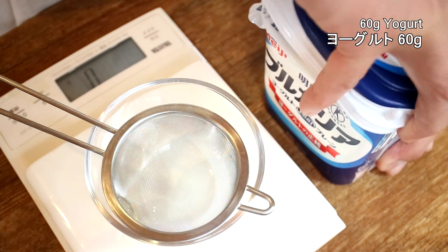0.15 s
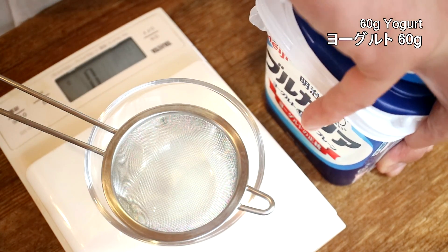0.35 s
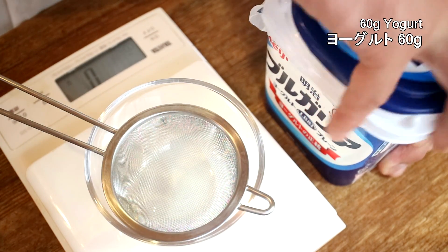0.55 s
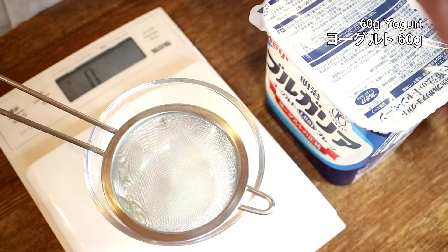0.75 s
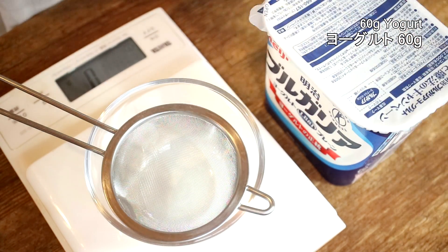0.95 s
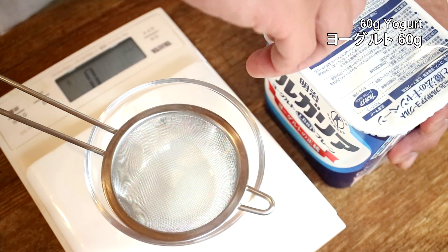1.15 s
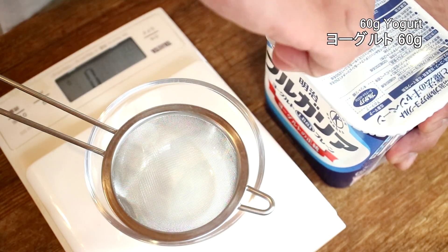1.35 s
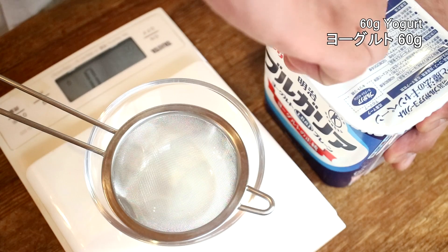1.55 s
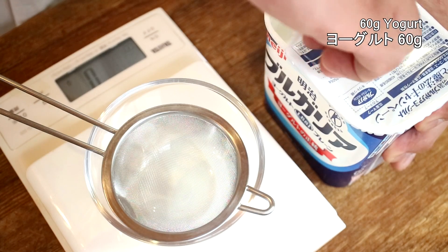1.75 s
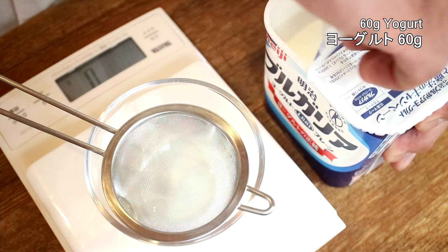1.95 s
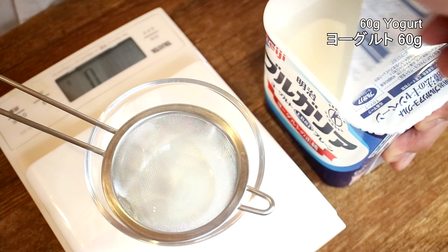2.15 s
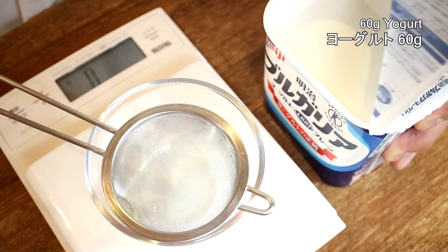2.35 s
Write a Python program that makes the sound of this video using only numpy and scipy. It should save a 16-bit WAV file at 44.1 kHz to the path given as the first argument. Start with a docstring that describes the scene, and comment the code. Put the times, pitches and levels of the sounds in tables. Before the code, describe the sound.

A plastic lid pops off a tub, then its paper seal crackles and peels back.

```python
"""A plastic lid creaks and pops off its tub, fingers tap the tub, then the paper seal is pinched and peeled.
The tub stands on a table in a small kitchen, close to a stereo microphone.
Blows and stick-slip rubbing ring the same tub modes; the paper crackles and squeaks on top.
The kitchen answers over a faint hum. The two microphone ports hear the tub's midrange unequally."""
import sys
import numpy as np
from scipy import signal
from scipy.fft import rfft, irfft
from scipy.io import wavfile

SR = 44100
rng = np.random.default_rng(int(sys.argv[2]) if len(sys.argv) > 2 else 0)


def int16_out(signal):
    """Quantize to a 16-bit WAV file."""
    q = np.round(np.clip(np.atleast_2d(signal).T, -1, 1) * 32767)
    wavfile.write(sys.argv[1], SR, q.astype(np.int16))


N = 110250
T = np.arange(N) / SR
F = np.maximum(np.arange(N // 2 + 1) * SR / N, 1)

# Rubbing trim for each mode group, low to high: gain_db
RUB_TRIM = (-4.5, -2, -6, -6.5, -5.5, -6.5)


def tub(slips_per_s=1200, shakes_per_s=3000, blow_db=-0.5, low_cut_hz=115):
    """The tub, close up: blows and stick-slip rubbing ring each of six groups of modes."""
    impulse, out = 1. * (T == 0), 0
    for group, rub_column in enumerate((1, 2, 3, 3, 4, 4)):
        slips, shakes = grains(slips_per_s, spread_db=2.5), grains(shakes_per_s, spread_db=0.7)
        blow_peak = np.abs(ring(impulse, group)).max()
        slip_rms = np.sqrt(np.mean(ring(slips, group) ** 2))
        struck = blows(group + 1, shakes) * undb(blow_db) / blow_peak
        rubbed = slips * rubbing(rub_column) * undb(RUB_TRIM[group]) / slip_rms
        out = out + ring(struck + rubbed, group)
    return signal.lfilter(*signal.butter(2, low_cut_hz, "high", fs=SR), out)


# Modes of the tub, lid and table, levels relative within a group: pitch_hz, level_db, t60_s
TUB_MODES = [(160.8, 0.5, 0.11), (221, -5.5, 0.037), (277.4, -1.5, 0.088), (427, -4.5, 0.023),
             (451, 4.5, 0.079), (513.5, 2, .07), (677, -7, .07), (833.7, 4, 0.06), (912, -0.5, 0.037),
             (944, -8, 0.037), (1007, 2, 0.042), (1133, -11.5, .05), (1220, -16, .04), (1666, 0, 0.02),
             (1617, -1.5, 0.047), (1817, 6, 0.023), (1994, -3, 0.017), (2366, 1.5, 0.02), (2748, 3.5, .025),
             (3193, -4.5, .025), (3443, -8.5, 0.048), (3770, -7.5, .025)]
# Borders of the mode groups: edge_hz
GROUP_EDGES = (110, 350, 600, 915, 1400, 2200, 4500)


def ring(force, group):
    """A force sets one group of modes ringing, each a decaying sine."""
    low, high = GROUP_EDGES[group:group + 2]
    band = signal.butter(1, (low * 0.71, high * 1.59), "band", fs=SR, output="sos")
    force, out = signal.sosfilt(band, force), 0
    for hz, db, t60 in TUB_MODES:
        if low <= hz < high:
            pole = np.exp((2j * np.pi * hz - np.log(1000) / t60) / SR)
            out = out + undb(db) * signal.lfilter([1], [1, -pole], force).imag
    return out


# Blows of lid and fingers, relative strength in each mode group and in the crack:
# start_s, bottom_db, walls_db, lid_low_db, lid_high_db, rim_low_db, rim_high_db, crack_db
BLOWS = [(0.139, -66, -58, -57, -51, -55, -59, -78), (0.19, -40, -31.5, -38, -28.5, -29.5, -32, -68),
         (0.213, -32.5, -15.5, -4, -12, -12, -24.5, -27),
         (0.227, -44.5, -26.5, -23.5, -37.5, -28, -38.5, -59.5),
         (0.239, -71.5, -44, -34.5, -52, -55, -44, -39.5), (0.255, -46, -40.5, -41.5, -56, -41.5, -55, -52),
         (0.272, -54, -30.5, -33.5, -51, -34.5, -55, -59), (0.349, -64, -46, -49.5, -52.5, -45.5, -51, -57),
         (0.524, -58.5, -62, -69, -50, -56.5, -65.5, -75), (0.575, -71, -61, -65, -40.5, -62, -72, -80),
         (0.592, -57, -39, -35, -29.5, -35, -33.5, -75), (0.607, -54.5, -61, -52.5, -49.5, -52.5, -49, -68),
         (1.1, -58.5, -38.5, -35.5, -33, -52, -47.5, -64.5), (1.108, -45.5, -36, -42, -41, -47, -64, -75),
         (1.171, -68, -53, -67, -45.5, -70, -59, -71), (1.215, -60, -62, -48, -55, -73, -71, -75),
         (1.328, -46.5, -34, -30.5, -44, -45.5, -47.5, -62.5),
         (1.503, -62, -60.5, -49.5, -45, -52.5, -62.5, -51),
         (1.572, -49.5, -49, -63, -52, -60.5, -42, -54.5), (1.583, -74, -61, -39.5, -66, -53, -41, -41),
         (1.6, -76, -73, -38, -39, -67, -47, -36), (1.636, -46, -43, -37, -36, -70, -44, -42),
         (1.733, -58, -52.5, -40.5, -36.5, -53, -50, -68), (1.825, -71, -48.5, -50.5, -28, -45, -39, -63),
         (1.863, -56, -36.5, -100, -30.5, -38, -36, -45), (1.883, -39, -64, -76, -29, -62, -46, -53),
         (1.949, -43, -59, -38, -44, -55, -45, -37), (2.002, -46.5, -62, -55, -44, -61, -42, -38),
         (2.223, -66, -52, -26, -31.5, -51, -31, -31.5), (2.235, -46, -63, -50.5, -31, -24.5, -26, -34.5),
         (2.39, -51, -56, -59, -53, -42.5, -54, -49)]


def blows(column, shakes=0, rattle_db=-33, rattle_delay_s=0.0053, rattle_decay_s=0.02):
    """One click a blow; any shakes follow it as a dying rattle."""
    clicks = np.zeros(N)
    for row in BLOWS:
        clicks[int(row[0] * SR)] = undb(row[column])
    fade = decay(np.roll(clicks, int(rattle_delay_s * SR)), rattle_decay_s)
    return clicks + undb(rattle_db) * shakes * fade


# Relative strength of the rubbing: time_s, bottom_db, walls_db, lid_db, rim_db, paper_db
RUBBING = [(0, -62, -77, -57, -81.5, -87), (0.06, -94, -56, -59, -61.5, -75.5),
           (0.12, -53, -68.5, -67.5, -79, -101), (0.182, -77, -60, -61.5, -61, -69),
           (0.42, -57.5, -69, -66, -72.5, -91.5), (0.5, -74.5, -76, -69, -85, -111.5),
           (0.54, -75, -74.5, -55.5, -67, -69.5), (0.565, -81.5, -75, -74, -76, -92),
           (0.613, -52, -53, -67, -58.5, -66.5), (0.7, -71, -80, -82, -86, -102.5),
           (0.79, -77.5, -84.5, -77.5, -80, -78.5), (0.85, -80.5, -71.5, -77, -89.5, -94.5),
           (0.94, -74.5, -81, -77, -79, -79), (1.0, -88.5, -81, -77.5, -80, -84),
           (1.07, -91.5, -67, -69, -65.5, -72.5), (1.15, -85, -68, -71, -80, -82),
           (1.24, -110.5, -77, -53, -66.5, -82), (1.3, -77.5, -66, -72, -74, -83),
           (1.348, -70, -56, -47, -66.5, -66), (1.45, -67.5, -74.5, -78, -83.5, -86),
           (1.5, -74, -67.5, -63, -68, -68.5), (1.55, -69, -62.5, -58.5, -62.5, -67.5),
           (1.61, -51, -62, -51, -57, -58), (1.681, -54.5, -71, -67, -73.5, -78),
           (1.75, -69, -62, -51.5, -61.5, -68), (1.8, -53, -62, -58, -60.5, -69),
           (1.839, -49, -48, -41.5, -50.5, -59), (1.9, -47.5, -54, -38, -48.5, -53.5),
           (1.95, -58, -52.5, -47.5, -53.5, -57.5), (1.98, -57, -61, -50, -54.5, -61.5),
           (2.04, -49, -59, -47, -55.5, -59.5), (2.08, -53.5, -58, -49.5, -53, -65.5),
           (2.12, -48, -53.5, -46.5, -52.5, -59), (2.171, -33.5, -44, -40.5, -56, -57.5),
           (2.2, -40, -49, -48, -53.5, -59), (2.26, -36, -47, -45, -52, -55.5),
           (2.29, -46.5, -56, -53, -50.5, -57.5), (2.33, -35, -61, -48.5, -55.5, -61.5),
           (2.37, -45.5, -52.5, -55, -55, -58), (2.452, -36, -61, -51, -53, -60.5),
           (2.5, -43, -55, -43, -54, -59)]


def rubbing(column):
    """How hard one part is rubbed, gliding from moment to moment."""
    rows = np.array(RUBBING)
    return undb(np.interp(T, rows[:, 0], rows[:, column]))


CRACKLE_PER_S, CRACKLE_SPREAD_DB = 1700, 2
# Spectrum of the paper seal: frequency_hz, density_db
PAPER_SPECTRUM = [(1760, -33), (3000, -5), (3490, -1.5), (4100, -5.5), (4770, -4.5), (7270, -8.5),
                  (12900, -22), (16800, -61), (22000, -120)]


def paper(hiss_share=0.7, crackle_db=1.5, crack_db=-9.5, crack_cutoff_hz=6145, tail_db=-16):
    """Paper and skin crackle wide across the microphone, with a short bright crack at each blow."""
    def crackle():
        clicks = grains(CRACKLE_PER_S, CRACKLE_SPREAD_DB)
        return unit(colour(clicks + hiss_share * rng.standard_normal(N), PAPER_SPECTRUM))

    mid, side = crackle(), crackle()
    peel = np.array([mid + side, mid - side]) * rubbing(-1) * undb(crackle_db)
    hiss = colour(rng.standard_normal(N), PAPER_SPECTRUM)
    hiss = unit(signal.lfilter(*signal.butter(1, crack_cutoff_hz, fs=SR), hiss))
    snaps = blows(-1)
    cracks = decay(snaps, decay_s=0.0022) + undb(tail_db) * decay(snaps, decay_s=0.025)
    return peel + hiss * cracks * undb(crack_db)


# Brief squeaks of the stretched seal: start_s, length_s, pitch_hz, level_db
SQUEAKS = [(0.78, 0.03, 2770, -76), (0.93, 0.03, 2940.0, -76), (1.55, 0.02, 6400, -65),
           (1.552, 0.014, 3340, -60), (1.597, 0.0067, 5130, -48), (1.608, 0.0098, 6160, -49.5),
           (1.811, 0.033, 4320.0, -53.5), (1.842, 0.051, 3700, -52.5), (1.873, 0.023, 6410.0, -56),
           (1.93, 0.032, 2680, -48.5), (2.009, 0.044, 2910, -52.5), (2.041, 0.025, 7000, -63.5),
           (2.102, 0.015, 3960.0, -52.5), (2.133, 0.054, 2770, -49), (2.202, 0.054, 2730.0, -51),
           (2.294, 0.1, 7340, -62), (2.388, 0.014, 3500, -48.5), (2.4, 0.04, 6800, -61)]


def squeaks(q=15.5, edge_s=0.0025):
    """Each short spell of slipping rings one narrow resonance of the taut paper."""
    slips, out = grains(CRACKLE_PER_S, CRACKLE_SPREAD_DB), 0
    for start, length, hz, db in SQUEAKS:
        gate = np.clip(np.minimum(T - start, start + length - T) / edge_s, 0, 1)
        squeak = signal.lfilter(*signal.iirpeak(hz, q, fs=SR), gate * slips)
        out = out + undb(db) * squeak * np.sqrt(SR * q / (np.pi * hz))  # makes up for the narrow band
    return out


def kitchen(sound, level_db=-12.5, t60_s=0.29, treble_db=-3, treble_t60_s=0.25):
    """The walls answer with a short tail, duller as it fades, different at each port."""
    damping_hz, low_cut_hz, onset_s = 3000, 450, 0.0061
    t = T[:SR // 2]
    dull, bright = rng.standard_normal((2, 2, len(t)))
    dull = signal.lfilter(*signal.butter(1, damping_hz, fs=SR), dull) * undb(-60 * t / t60_s)
    bright = bright * undb(treble_db - 60 * t / treble_t60_s)
    tail = (dull + bright) * np.clip(t / onset_s, 0, 1)
    tail = signal.lfilter(*signal.butter(1, low_cut_hz, "high", fs=SR), tail)
    tail = unit(tail) / np.sqrt(len(t))
    return signal.fftconvolve(sound[None], tail, axes=1)[:, :N] * undb(level_db)


# Spectrum of the quiet kitchen: frequency_hz, density_db
AIR_SPECTRUM = [(18, -25), (30, 4.5), (134, -10), (182, -12), (253, -14), (753, -21.5), (946, -22),
                (2420, -28), (2610, -27), (5590, -35), (12000, -43), (12900, -49.5), (16800, -79),
                (22000, -120)]
# Tones of an appliance in the background: pitch_hz, level_db
HUM = [(236.9, -71.5), (441.4, -79.5)]


def room_tone(air_db=-62.5, alike_below_hz=486):
    """Room noise, alike at both ports in the bass only, and a steady appliance hum."""
    mid, side = (rfft(rng.standard_normal(N)) * undb(along(AIR_SPECTRUM)) for _ in range(2))
    coherence = 1 / (1 + (F / alike_below_hz) ** 2)
    mid, side = irfft(mid * np.sqrt(1 + coherence), N), irfft(side * np.sqrt(1 - coherence), N)
    air = np.array([mid + side, mid - side]) / np.sqrt(np.mean(mid ** 2))
    hum = sum(np.sqrt(2) * undb(db) * np.sin(2 * np.pi * (hz * T + rng.random())) for hz, db in HUM)
    return air * undb(air_db) + hum


# Balance of the microphone's two ports: frequency_hz, left_minus_right_db
PORT_BALANCE = [(60, 1.5), (110, 0), (200, -0.5), (360, 2.5), (640, 7.5), (1160, 11), (2100, -1.5),
                (3810, -0.5), (6890, -0.5), (12500, -0.5)]
# Phase between the ports: frequency_hz, left_lead_rad
PORT_PHASE = [(100, 0), (860, .4), (1040, .9), (1160, 2.2), (1550, .2), (3200, -.7), (4000, .5), (13000, 0)]


def ports(sound):
    """The right port hears the midrange weaker than the left and turned in phase."""
    right = undb(-along(PORT_BALANCE)) * np.exp(-1j * along(PORT_PHASE))
    makeup = 2 / np.maximum(np.abs(1 + right), 1)  # holds up the level of the two ports' sum
    return irfft(rfft(sound) * np.array([np.ones_like(right), right]) * makeup, N)


def grains(per_s, spread_db, loudest_one_in=60):
    """Random clicks of uneven, capped size, at unit rms."""
    chance, sign, rarity = rng.random(size=(3, N))
    size = undb(-spread_db * np.log(np.maximum(rarity, 1 / loudest_one_in)))
    return unit((chance < per_s / SR) * np.sign(sign - .5) * size)


def decay(clicks, decay_s):
    """Gives each click an exponential tail."""
    return signal.lfilter([1], [1, -np.exp(-1 / (decay_s * SR))], clicks)


def along(table):
    """Rows of (frequency_hz, value) read at every frequency."""
    hz, value = np.array(table, float).T
    return np.interp(np.log(F), np.log(hz), value)


def colour(x, spectrum):
    return irfft(rfft(x) * undb(along(spectrum)), N)


def undb(db):
    return 10 ** (np.asarray(db) / 20)


def unit(x):
    return x / np.sqrt(np.mean(x ** 2))


def scene():
    """Tub and seal near the microphone, the kitchen behind them."""
    ringing, crackle = tub() + squeaks(), paper()
    reverb = kitchen(ringing + crackle.mean(0))
    return ports(ringing + crackle + reverb) + room_tone()


def record(dry, low_cut_hz=33.3, top_hz=13060):
    """The microphone drops the deepest bass; the recorder cuts the top."""
    dry = signal.sosfilt(signal.butter(4, low_cut_hz, "high", fs=SR, output="sos"), dry)
    return signal.sosfilt(signal.ellip(8, .2, 70, top_hz, fs=SR, output="sos"), dry)


dry = scene()
out = record(dry)
int16_out(out)
```